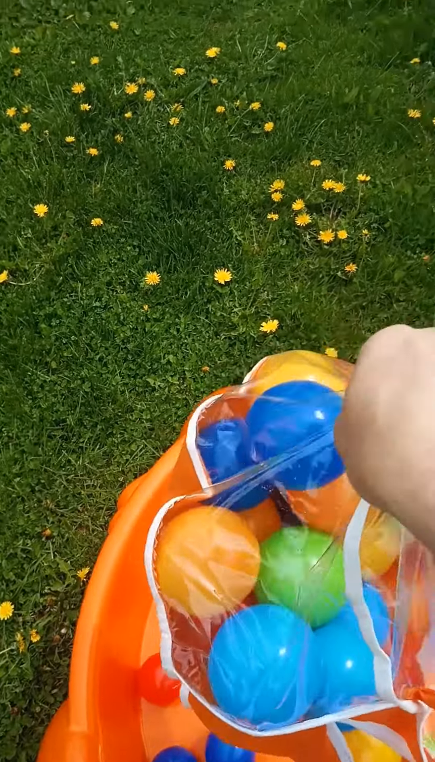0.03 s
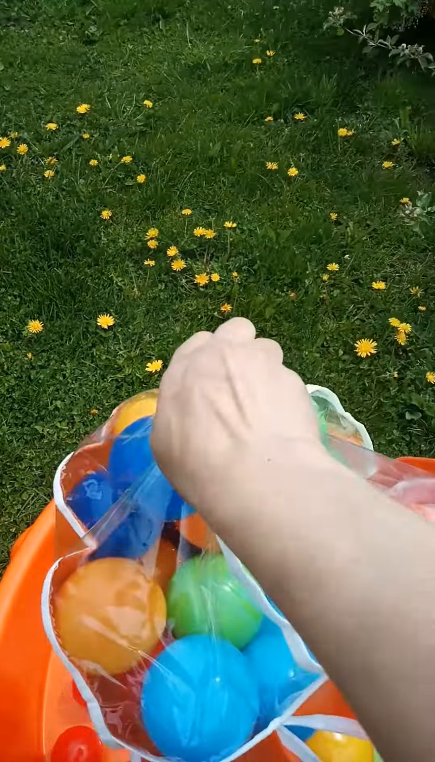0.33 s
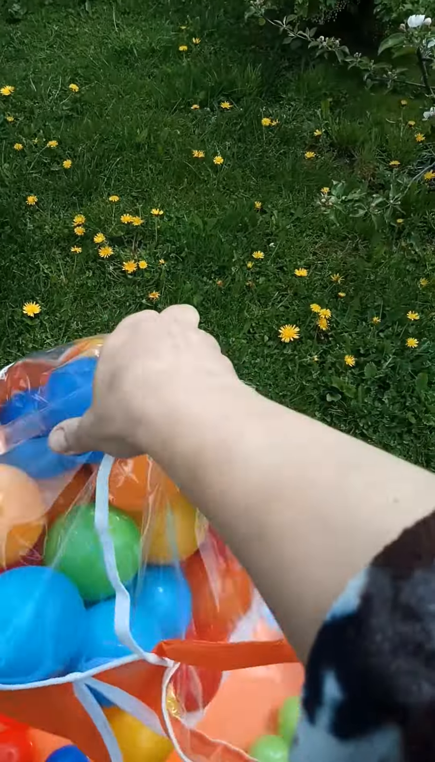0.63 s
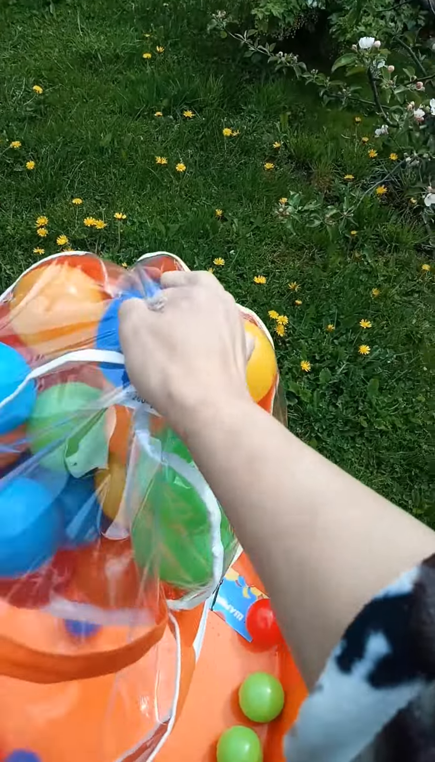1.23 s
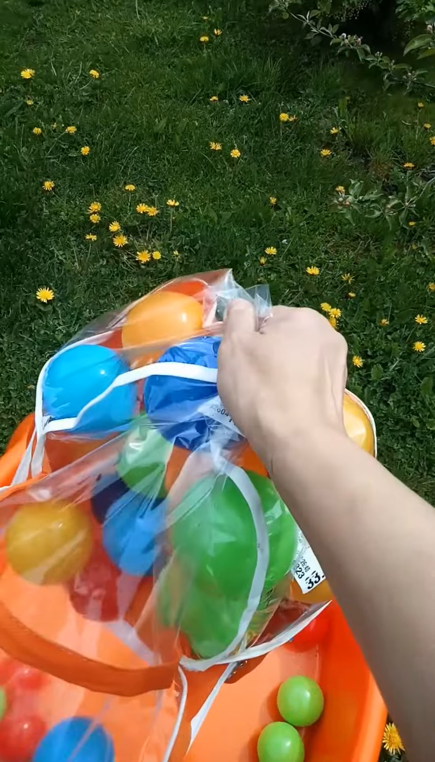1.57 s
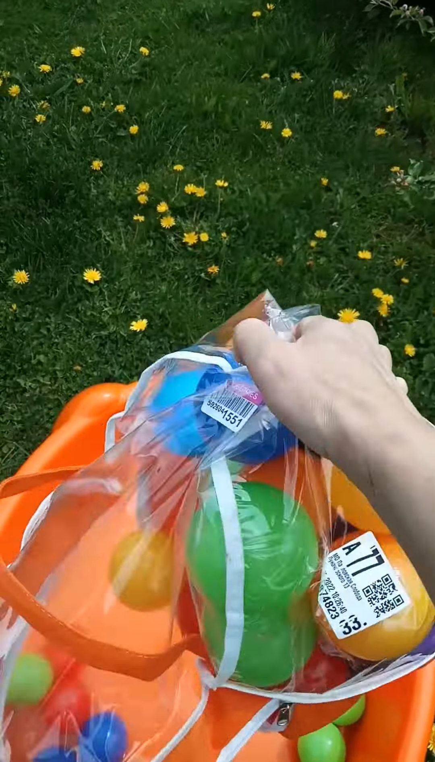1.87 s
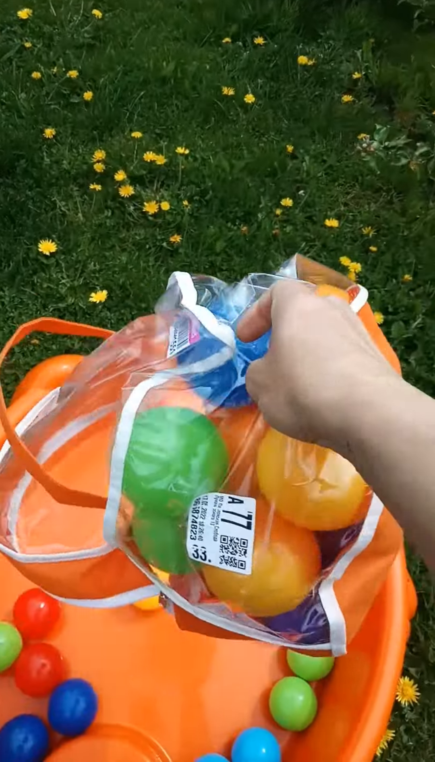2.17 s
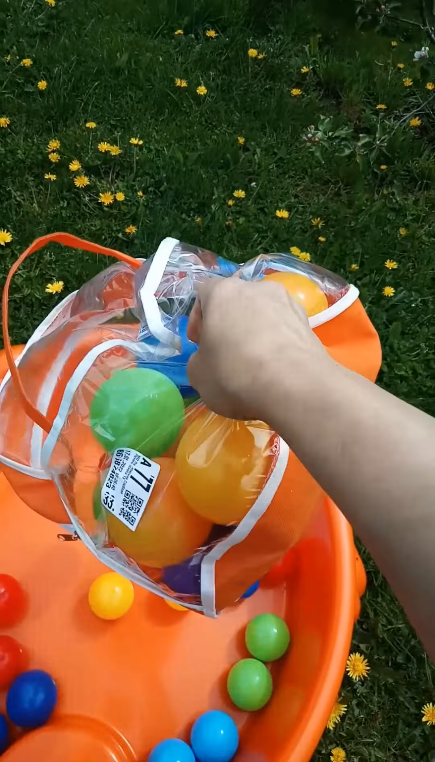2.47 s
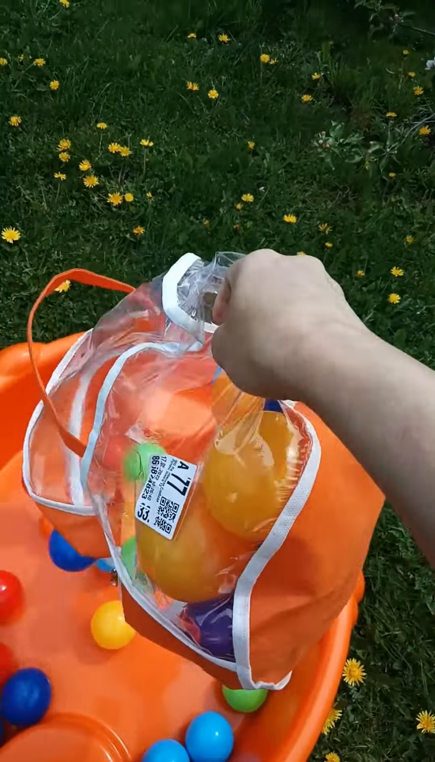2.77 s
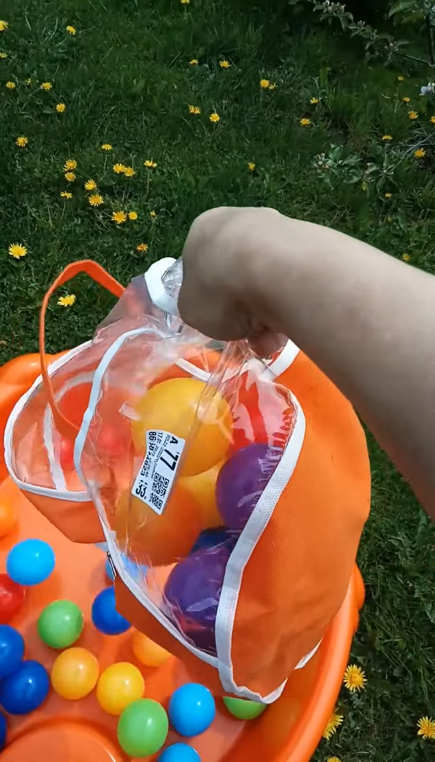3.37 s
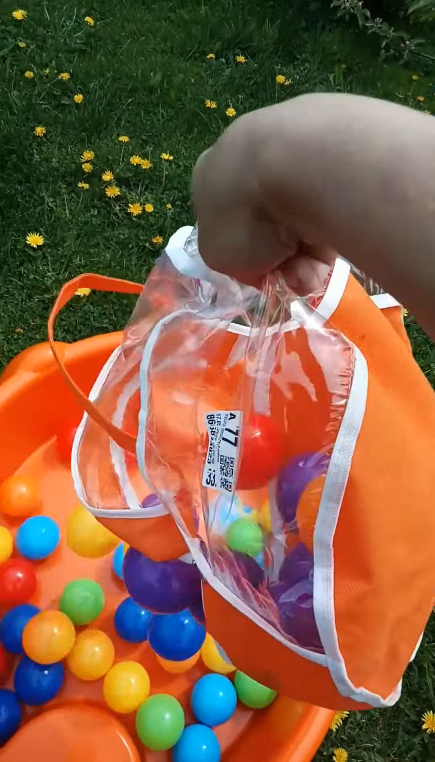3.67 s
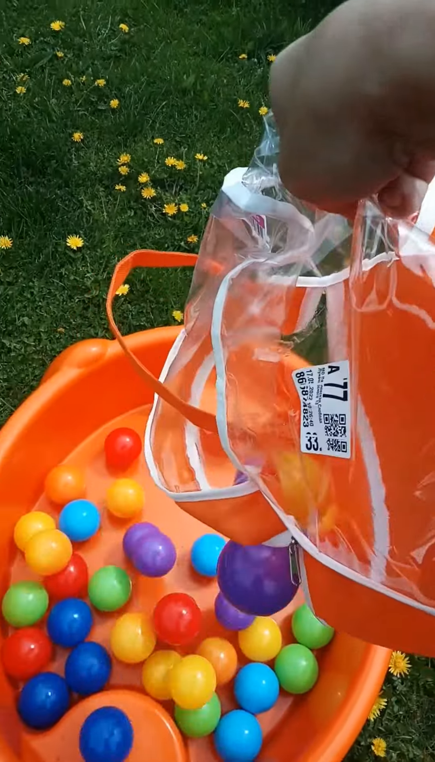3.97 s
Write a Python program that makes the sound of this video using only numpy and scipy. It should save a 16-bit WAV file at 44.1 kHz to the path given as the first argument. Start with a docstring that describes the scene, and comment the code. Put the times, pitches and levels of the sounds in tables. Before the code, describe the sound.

Hollow plastic balls thump into a plastic pool, shaken from a crinkling plastic bag.

```python
"""Hollow plastic balls drop into a hard plastic pool, first one by one, then pouring out.
Each landing thumps, knocks and makes the pool's shell ring like a drum; the balls then roll and tap
each other. They are shaken from a plastic bag, whose thin film rustles, snaps at its creases and
swishes as it slides over itself. The pool stands on a lawn in the open air, close to a dull microphone."""
import sys
import numpy as np
from scipy import signal
from scipy.fft import rfft, irfft, next_fast_len
from scipy.io import wavfile
from scipy.ndimage import uniform_filter1d, minimum_filter1d, map_coordinates

SR = 44100
rng = np.random.default_rng(int(sys.argv[2]) if len(sys.argv) > 2 else 0)


def unload_audio(sound):
    """Save the sound as a 16-bit wav file, at the path given as the first command line argument."""
    columns = np.transpose(np.atleast_2d(sound))
    # keep every value between -1 and 1, then stretch to whole-number steps
    steps = np.round(np.clip(columns, -1, 1) * 32767)
    wavfile.write(sys.argv[1], SR, steps.astype(np.int16))


N = 176400
T = np.arange(int(.3 * SR)) / SR  # seconds since the start of one short sound
CONTACT_S = .0013  # how quickly a ball's knock or tap builds up

# The tone of a ball's click. Each row: frequency in Hz, level in dB.
CLICK_TONE = [(500, -12), (1300, 8.5), (1650, 2), (2200, 10), (2800, -2.5), (4000, -25), (8000, -7)]
# The tone of the bag's thin film. Each row: frequency in Hz, level in dB.
FILM_TONE = [(100, -17.5), (500, -15), (1000, 1), (1450, 0.5), (3000, 0), (4000, -6), (8000, -13.5)]


def amp(db):
    """Turn decibels into a number to multiply by."""
    return 10 ** (np.asarray(db) / 20)


def unit(x):
    """Scale a sound to an average strength (rms) of 1."""
    return x / np.sqrt(np.mean(x ** 2) + 1e-20)


def fade(seconds):
    """A smooth fade that falls by 60 dB in the given time."""
    return amp(-60 * T / seconds)


def add(track, start, sound):
    """Mix a sound into a track, start seconds in."""
    i = max(round(start * SR), 0)
    track[i:i + len(sound)] += sound[:max(N - i, 0)]


def curve(rows):
    """Join (seconds, value) points with straight lines, one value per sample."""
    return np.interp(np.arange(N) / SR, *np.transpose(rows))


def wobble(rate):
    """A smooth curve through rate random values a second."""
    return map_coordinates(rng.standard_normal(int(N * rate / SR) + 4), [np.arange(N) * rate / SR])


def coloured(x, tone):
    """Filter a sound so that its lows and highs follow a table of (Hz, dB) points."""
    size = 2 * next_fast_len(len(x) // 2 + 4096)
    hz, db = np.transpose(tone)
    gain = amp(np.interp(np.log(np.fft.rfftfreq(size, 1 / SR) + 1), np.log(hz), db))
    # These three lines make the filter ring only after a sound, never before it.
    cepstrum = irfft(np.log(gain))
    cepstrum[1:size // 2] *= 2
    cepstrum[size // 2 + 1:] = 0
    return irfft(rfft(x, size) * np.exp(rfft(cepstrum)))[:len(x)]


def bursts(tone, count):
    """Short pieces of noise with the given tone, one for each event."""
    noise = unit(coloured(rng.standard_normal(N), tone))
    return [noise[i:i + len(T)] for i in rng.integers(0, N - len(T), count)]


def contacts(rate, spread_db):
    """Tiny random kicks of uneven size, about rate a second."""
    happens = rng.random(N) < rate / SR
    size = amp(spread_db * np.clip(rng.standard_normal(N), -2, 2))
    return unit(happens * size * rng.choice([-1, 1], N))


def air():
    """Faint, steady background noise, mostly low in pitch."""
    # The tone of the background. Each row: frequency in Hz, level in dB.
    air_tone = [(25, 0.5), (150, 12.5), (500, 5.5), (2500, -13), (4000, -28.5), (5500, -22.5), (8000, -26),
                (13000, -26.5), (16000, -27)]
    return amp(-56.5) * unit(coloured(rng.standard_normal(N), air_tone))


def sliding_hiss():
    """Plastic sliding on plastic adds a thin, airy hiss while the balls pour out."""
    # How loud the hiss is. Each row: time in seconds, level in dB.
    levels = [(2.3, -64), (2.42, -46.5), (2.85, -45.5), (2.92, -58), (3.0, -44), (3.22, -51), (3.28, -37),
              (3.6, -45), (4.0, -37)]
    above_hz = 6540
    treble = signal.butter(4, above_hz, "high", fs=SR, output="sos")
    noise = signal.sosfilt(treble, rng.standard_normal(N))
    return amp(curve(levels) + 2 * wobble(rate=32)) * unit(noise)


def bag_rustle():
    """Many tiny crinkles, each with its own pitch, in the soft hiss of balls sliding in the bag."""
    # How loud the rustle is. Each row: time in seconds, level in dB.
    levels = [(0.0, -61), (0.3, -58), (0.52, -42), (0.64, -51), (0.86, -47), (1.0, -59), (1.11, -67.5),
              (1.3, -46.5), (1.41, -39.5), (1.49, -42), (1.65, -51), (1.79, -64), (1.9, -52), (2.06, -53),
              (2.13, -48), (2.39, -47.5), (2.53, -45), (2.62, -52.5), (2.95, -51), (3.04, -50), (3.21, -66),
              (3.41, -48.5), (3.75, -49), (3.85, -61.5), (4.0, -46)]
    per_second, low_hz, high_hz, crinkle_s = 330, 1600, 4000, .012
    grains = contacts(rate=1200, spread_db=4) + rng.standard_normal(N)
    crinkles = np.zeros(N)
    t = T[T < crinkle_s]
    decay = fade(crinkle_s)[:len(t)]
    for when, pitch, size in rng.random((int(per_second * N / SR), 3)):
        hz = low_hz * (high_hz / low_hz) ** pitch
        add(crinkles, when * N / SR, size ** 2 * decay * np.sin(2 * np.pi * hz * t))
    texture = unit(coloured(grains, FILM_TONE)) + unit(crinkles)
    return amp(curve(levels) + 3 + 4.7 * wobble(rate=20)) * unit(texture)


def bag_swishes():
    """Tight film sticks and slips, ringing at a wandering pitch that sinks as the film slows."""
    # Film sliding over itself. Each row: start and length in seconds, level in dB,
    # first and last pitch in Hz.
    slides = [(0.423, 0.09, -41, 4000, 2990), (1.336, 0.098, -43.5, 4265, 3870),
              (2.101, 0.086, -39, 3750, 3346), (2.929, 0.044, -44, 3950, 3810),
              (3.267, 0.22, -44, 2826, 2213), (3.49, 0.083, -39.5, 3755, 3250),
              (3.569, 0.081, -50, 3650, 3330)]
    width_hz, wander_hz = 170, 140
    smoothing = signal.butter(1, width_hz, fs=SR)
    out = np.zeros(N)
    for start, length, db, first_hz, last_hz in slides:
        n = int(length * SR)
        hz = np.linspace(first_hz, last_hz, n) + wander_hz * wobble(rate=55)[:n]
        slips = contacts(rate=2200, spread_db=3)[:n]
        ring = signal.lfilter(*smoothing, slips) * np.sin(2 * np.pi * np.cumsum(hz) / SR)
        grit = amp(-14) * unit(coloured(slips, FILM_TONE))
        add(out, start, amp(db) * signal.windows.tukey(n, .5) * (unit(ring) + grit))
    return out


def bag_snaps():
    """A crease gives way with a short note and a crack, and the film flutters after it."""
    # Creases snapping. Each row: start in seconds, level in dB, pitch in Hz,
    # vibrations until the note is loudest (at least half of one is used).
    creases = [(0.25, -20.5, 2070, 0.39), (0.372, -24.5, 2800, 1.25), (0.4367, -18, 3320, 0.64),
               (0.4553, -11, 2760, 0.82), (0.4995, -22, 2170, 0.41), (0.5293, -18, 2500, 0.44),
               (0.539, -10.5, 3460, 1.17), (0.5782, -18.5, 2800, 1.2), (0.614, -7, 1680, 0.39),
               (0.6687, -1.5, 2140, 1.25), (0.6929, -19, 2160, 1.5), (0.758, -11, 3140, 1.25),
               (0.7938, -6.5, 2990, 0.9), (0.8127, -16.5, 3030, 0.64), (0.824, -17.5, 2400, 0.58),
               (0.8951, -16, 1286, 0.37), (0.9516, -22, 3030, 1.3), (1.035, -23, 2620, 0.86),
               (1.068, -22.5, 2620, 1.5), (1.086, -21, 3300, 1.4), (1.111, -17, 2870, 2.5),
               (1.1479, -25, 1850, 0.6), (1.1763, -18.5, 2800, 0.47), (1.1998, -26.5, 3160, 1.9),
               (1.224, -21, 2930, 1.35), (1.2287, -34, 2890, 1.4), (1.275, -15, 3100, 1.16),
               (1.3264, -17, 2530, 1.3), (1.362, -20.5, 2900, 1.1), (1.377, -16.5, 1980, 0.71),
               (1.383, -11, 2790, 0.47), (1.402, -14.5, 1600, 1.24), (1.412, -11, 2870, 0.88),
               (1.4196, -11.5, 1520, 0.29), (1.447, -13, 1850, 0.48), (1.4669, -17, 1340, 0.39),
               (1.5031, -9, 3080, 2), (1.527, -9, 2960, 1.66), (1.5482, -22.5, 2720, 1.5),
               (1.625, -20, 3100, 2), (1.6373, -20, 3490, 2.4), (1.6598, -15, 1910, 1),
               (1.663, -11, 3330, 0.78), (1.6973, -17, 3540, 0.41), (1.7788, -24, 3500, 1.7),
               (1.8233, -19, 2770, 1), (1.8839, -25, 2190, 1.8), (1.9649, -12.5, 1550, 1.18),
               (1.972, -13, 3120, 1.3), (2.0009, -24, 2400, 1.2), (2.034, -17.5, 1940, 0.76),
               (2.0523, -10.5, 2050, 0.83), (2.0985, -13.5, 3100, 1.75), (2.255, -25.5, 2710, 1.4),
               (2.3221, -26.5, 2860, 1), (2.389, -27, 2040, 0.5), (2.4046, -8.5, 2460, 1.1),
               (2.4635, -15, 3340, 1.3), (2.723, -14.5, 1284, 1.6), (2.7541, -16.5, 3630, 1.3),
               (3.1144, -13.5, 2420, 0.37), (3.639, -21, 1240, 0.37)]
    crack = amp(-1) * fade(.0048)
    flutter = amp(-15.5) * fade(.038)
    noise_shape = (1 - np.exp(-T / .0004)) * (crack + flutter)
    out = np.zeros(N)
    for (start, db, hz, cycles), film in zip(creases, bursts(FILM_TONE, len(creases))):
        progress = T * hz / max(cycles, .5)  # 1 at the note's peak
        note = amp(-.5) * (progress * np.exp(1 - progress)) ** 2 * np.sin(2 * np.pi * hz * T)
        near_pitch = signal.butter(1, [hz / 2, hz * 2], "band", fs=SR)
        snap = amp(db) * signal.lfilter(*near_pitch, note + noise_shape * film)
        add(out, start, snap)
        add(out, start + .005, amp(-14) * snap)  # the sound bounces off the pool's floor
    return out


def bright_ticks():
    """A very short, bright tick tops a few of the sharpest snaps and landings."""
    # Bright ticks. Each row: start in seconds, level in dB.
    ticks = [(.343, -25), (0.538, -17.5), (1.11, -11), (1.418, -14), (1.735, -13.5)]
    above_hz = 4270
    treble = signal.butter(4, above_hz, "high", fs=SR, output="sos")
    out = np.zeros(N)
    for start, db in ticks:
        burst = fade(.011) * rng.standard_normal(len(T))
        add(out, start, amp(db) * signal.sosfilt(treble, burst))
    return out


def ball_rolling():
    """Loose balls roll and jostle: an uneven scrape that drums on the pool's shell."""
    # How loud the rolling is. Each row: time in seconds, level in dB.
    levels = [(0.0, -29), (0.09, -36), (0.34, -37), (0.72, -24.5), (0.89, -27.5), (0.95, -65), (1.16, -52),
              (1.32, -38), (1.75, -69), (1.9, -50), (2.27, -29), (2.45, -35), (2.54, -44), (2.66, -20),
              (2.91, -25.5), (3.35, -15.5), (3.5, -19), (3.73, -20.5), (3.88, -18), (4.0, -15.5)]
    # The tone of the shell under rolling balls. Each row: frequency in Hz, level in dB.
    roll_tone = [(25, -40), (60, -32), (100, -10), (130, -6.5), (160, -3), (195, 9.5), (270, -6.5),
                 (360, -8), (450, -23.5), (700, -20), (1150, -27.5), (2200, -38.5), (3200, -46),
                 (6000, -65)]
    scrape = rng.standard_normal(N) * amp(3.25 * wobble(rate=70))
    return amp(curve(levels) + 1.5) * unit(coloured(scrape, roll_tone))


def ball_taps():
    """Ball meets ball: two quick hollow tones and a click, without the pool's thump."""
    # Balls bumping each other. Each row: start in seconds, level in dB, lower pitch in Hz.
    taps = [(2.404, -13, 970), (2.52, -21, 2110), (2.679, -19, 900), (2.765, -11, 834),
            (2.803, -19.5, 2000), (3.035, -17.5, 835), (3.128, -15.5, 825), (3.168, -16, 910),
            (3.186, -28, 1820), (3.225, -28, 925), (3.297, -15.5, 2170), (3.365, -21, 737),
            (3.424, -16, 1000), (3.578, -19.5, 850), (3.704, -15.5, 1840), (3.757, -12.5, 1384),
            (3.943, -11, 1494), (3.978, -13, 1590), (3.988, -8.5, 1220)]
    shape = (1 - np.exp(-T / CONTACT_S)) * fade(.018)
    out = np.zeros(N)
    for (start, db, hz), click in zip(taps, bursts(CLICK_TONE, len(taps))):
        phase = 2 * np.pi * hz * T
        ring = np.sin(phase) + amp(-6.5) * np.sin(1.42 * phase)
        add(out, start, amp(db) * shape * (ring + amp(-8) * click))
    return out


def ball_drops():
    """Each ball thumps, knocks hollowly and clicks, and rings the pool differently at each spot."""
    # Balls landing. Each row: start in seconds, level of thump and shell together in dB,
    # settled thump pitch in Hz, knock level in dB, hollow pitch in Hz, click level in dB,
    # thump fade time in seconds, extra shell level in dB.
    landings = [(0.011, -16, 216, -61, 673, -85, 0.037, -12),
                (0.052, -26.5, 227.8, -33, 676, -68, 0.24, 8.5),
                (0.116, -25, 247, -37, 530, -60, 0.11, -11.5),
                (0.196, -25.5, 202, -34, 740, -37.5, 0.068, 4),
                (0.221, 1, 227.4, -20, 638, -22, 0.055, -7.5),
                (0.341, -2, 206.6, -21.5, 543, -28, 0.097, -1),
                (0.546, -10.5, 228.5, -22.5, 533, -29, 0.08, 3),
                (0.557, -10.5, 223, -44, 745, -33, 0.11, -4.5),
                (0.651, -15.5, 241, -29, 1110, -24.5, 0.092, -10),
                (0.735, -12, 362.6, -19, 990, -25, 0.076, 7.5),
                (0.755, -7, 230.4, -30, 707, -35, 0.12, -13.5),
                (0.85, -5.5, 205, -37, 681, -34, 0.074, -9.5),
                (1.271, -27.5, 202, -28.5, 810, -36, 0.09, -21.5),
                (1.7348, 5.5, 262.5, -18.5, 679, -31.5, 0.038, -9.5),
                (1.75, -6.5, 260.5, -49.5, 630, -58, 0.13, -28),
                (1.84, -23.5, 266, -49, 557, -61, 0.2, -17), (2.093, -20.5, 184, -21, 688, -24, 0.051, -6),
                (2.199, 0.5, 300, -15.5, 683, -20.5, 0.032, -13.5),
                (2.206, 6.5, 196, -37, 627, -47, 0.055, -12),
                (2.264, -21.5, 185, -34.5, 869, -34, 0.14, -2),
                (2.475, -1, 197.5, -22, 554, -25, 0.13, -1.5),
                (2.556, -1, 200.5, -17.5, 912, -19.5, 0.097, 1.5),
                (2.588, 3.5, 210, -16, 522, -41, 0.041, -5.5),
                (2.744, -14.5, 213, -19.5, 649, -23.5, 0.038, 0.5),
                (2.764, -4.5, 312, -14, 543, -35, 0.067, -2),
                (2.785, 3.5, 187.7, -22.5, 536, -28.5, 0.053, -5),
                (2.824, 0, 191, -20, 517, -27.5, 0.052, -5), (2.837, -4, 236, -22, 686, -21, 0.054, -0.5),
                (2.851, -8, 224, -16.5, 585, -22, 0.12, 6.5),
                (2.868, -7.5, 362, -21.5, 522, -29, 0.057, -4), (2.88, -2, 228, -21, 890, -36.5, 0.089, -3),
                (2.956, 1.5, 201.4, -19, 695, -28.5, 0.082, -3), (3.01, -19.5, 253, -32, 727, -23, 0.22, 2),
                (3.087, -11, 251.4, -22.5, 797, -33.5, 0.08, -1.5),
                (3.109, -10, 207.4, -20.5, 910, -40, 0.15, 0), (3.193, -15.5, 196, -29, 864, -40, 0.19, -1),
                (3.244, 4, 353, -17, 520, -20.5, 0.025, -5), (3.259, 1.5, 195, -31, 568, -29, 0.059, -5.5),
                (3.286, 5, 241, -16, 529, -18.5, 0.026, -5.5),
                (3.305, -7, 188, -26.5, 724, -26.5, 0.086, -1),
                (3.324, -1.5, 196, -25.5, 957, -25.5, 0.07, -16.5),
                (3.36, 0, 193, -34, 640, -42, 0.027, -9.5), (3.413, -13.5, 192, -37, 880, -23, 0.29, -11.5),
                (3.469, -13, 196, -21, 620, -47.5, 0.074, 0.5),
                (3.54, -20, 217, -26, 550, -22.5, 0.088, -3.5),
                (3.659, -11, 224.7, -16.5, 807, -25.5, 0.11, 7.5),
                (3.673, -7, 280, -22.5, 1146, -12, 0.028, 5.5), (3.691, -3.5, 189, -31, 522, -32.5, 0.1, 2),
                (3.739, -12.5, 226, -15, 528, -21, 0.14, -10),
                (3.75, -1, 186, -52.5, 533, -44, 0.11, -12.5),
                (3.761, -18, 228, -23.5, 563, -26, 0.063, -9.5),
                (3.774, -0.5, 201.5, -15.5, 500, -16, 0.089, -4.5),
                (3.799, -9.5, 243, -29.5, 797, -21.5, 0.1, 2.5),
                (3.841, -11.5, 283, -38, 960, -23.5, 0.048, -7.5),
                (3.857, 0.5, 207, -19.5, 716, -17, 0.089, -5), (3.87, -3, 288, -52, 533, -50.5, 0.076, -11),
                (3.933, -10, 154, -16.5, 1188, -15.5, 0.24, -6),
                (3.951, 2, 200.5, -38, 522, -45, 0.048, -7), (3.97, -14.5, 286, -24, 982, -18, 0.06, 3.5)]
    # The notes the pool's shell rings at. Each row: pitch in Hz, level in dB, fade time in seconds.
    shell_notes = [(95, -18, 0.23), (138, -14.5, 0.18), (170.4, -10.5, 0.19), (195.6, -1, 0.14),
                   (247.4, -10.5, 0.22), (296.5, -21.5, 0.23), (355, -11, 0.1), (401.5, -12, 0.11),
                   (503, -25, .09), (649, -25, 0.073), (750, -26, 0.11), (803.5, -32, 0.12),
                   (956, -35.5, 0.16), (1270, -32.5, 0.12)]
    # The tone of a ball's knock. Each row: frequency in Hz, level in dB.
    knock_tone = [(30, -23.5), (120, -25), (300, 2.5), (550, -5.5), (720, 4), (1200, -4.5), (1600, -13),
                  (3000, -24.5)]
    shell_hz = np.array(shell_notes)[:, 0]
    shell_rings = np.array([(-1) ** k * amp(db) * fade(seconds) * np.sin(2 * np.pi * hz * T)
                            for k, (hz, db, seconds) in enumerate(shell_notes, 1)])
    slow_rise = 1 - np.exp(-T / .0045)
    quick_rise = 1 - np.exp(-T / CONTACT_S)
    # A dented ball starts 44% higher in pitch, then relaxes.
    pitch_lift, relax_s = .44, .0044
    dented_time = T + pitch_lift * relax_s * (1 - np.exp(-T / relax_s))
    knocks = bursts(knock_tone, len(landings))
    clicks = bursts(CLICK_TONE, len(landings))
    out = np.zeros(N)
    for landing, knock_noise, click_noise in zip(landings, knocks, clicks):
        start, db, hz, knock_db, hollow_hz, click_db, thump_s, shell_db = landing
        thump = amp(5) * fade(thump_s) * np.sin(2 * np.pi * hz * dented_time)
        # A stiff, high-pitched spot hardly stirs the shell's lower notes: 20 dB less per octave.
        stiff_db = 20 * np.maximum(np.log2(.85 * hz / shell_hz), 0)
        spot_db = rng.normal(0, 5.8, len(shell_notes))
        shell = amp(shell_db - stiff_db + spot_db) @ shell_rings
        hollow = amp(1.5) * fade(.051) * np.sin(2 * np.pi * hollow_hz * T)
        knock = amp(knock_db) * (hollow + amp(4.5) * knock_noise * fade(.04))
        click = amp(click_db + 1) * click_noise * fade(.041)
        add(out, start, quick_rise * (knock + click) - amp(db) * slow_rise * (thump + shell))
    return out


def scene():
    """Balls and bag, close by in the open air, mixed into one channel."""
    balls = ball_drops() + ball_taps() + ball_rolling()
    bag = bag_snaps() + bag_rustle() + bag_swishes()
    return (balls + bag + sliding_hiss() + bright_ticks())[None]


def record(dry):
    """A dull microphone with faint background noise; a fast limiter turns the loudest peaks down."""
    # How well the microphone hears lows and highs. Each row: frequency in Hz, level in dB.
    mic_tone = [(20, -14), (50, -6), (100, -3), (3000, -0.5), (3600, -1), (4100, -6), (4900, -17),
                (6000, -28), (8000, -37), (12000, -30), (16000, -27.5)]
    ceiling, limiter_s, fade_out_s, top_hz = .92, .004, .004, 15700
    x = coloured(dry[0], mic_tone) + air()
    window = int(limiter_s * SR)
    safe_gain = ceiling / np.maximum(np.abs(x), ceiling)
    x = x * uniform_filter1d(minimum_filter1d(safe_gain, window), window)
    x = x * np.minimum(np.arange(N)[::-1] / (fade_out_s * SR), 1)
    treble_cut = signal.ellip(10, .1, 80, top_hz, fs=SR, output="sos")
    return signal.sosfilt(treble_cut, x)[None]


dry = scene()
out = record(dry)
unload_audio(out)
```